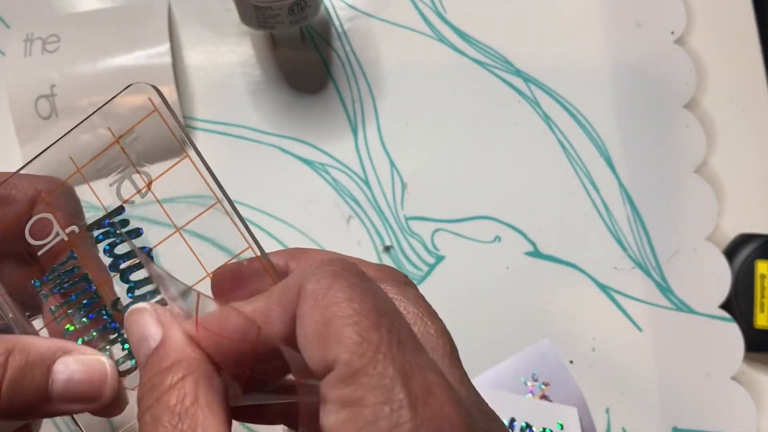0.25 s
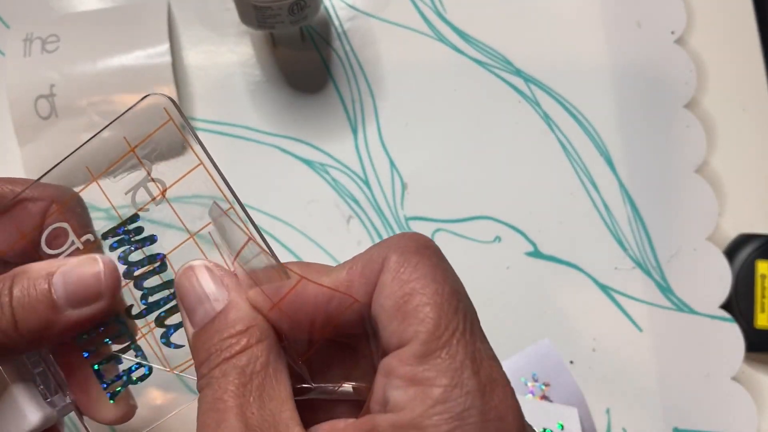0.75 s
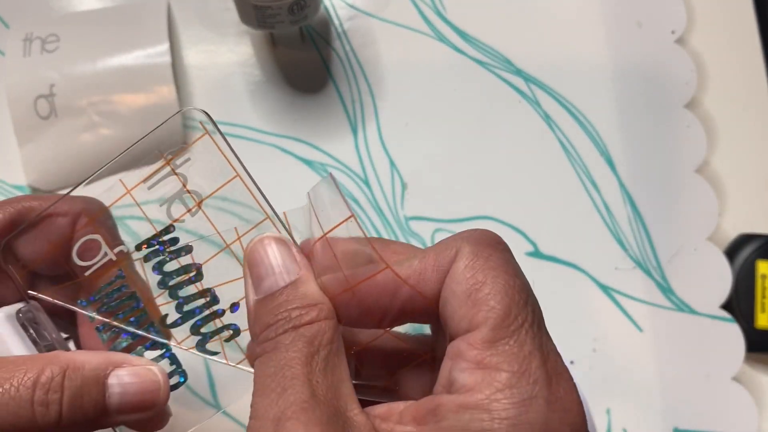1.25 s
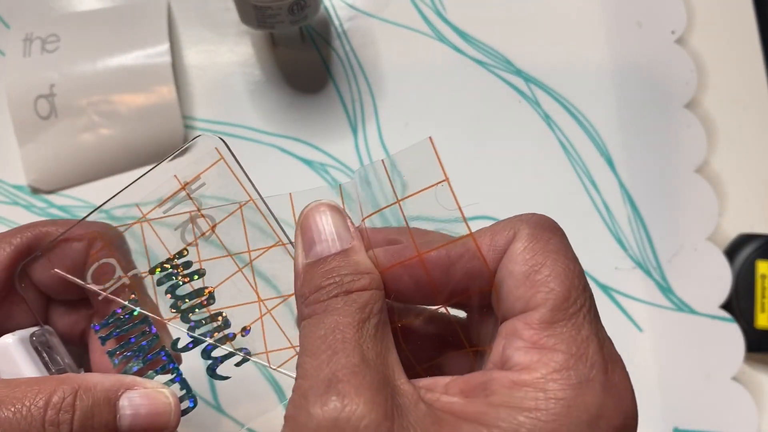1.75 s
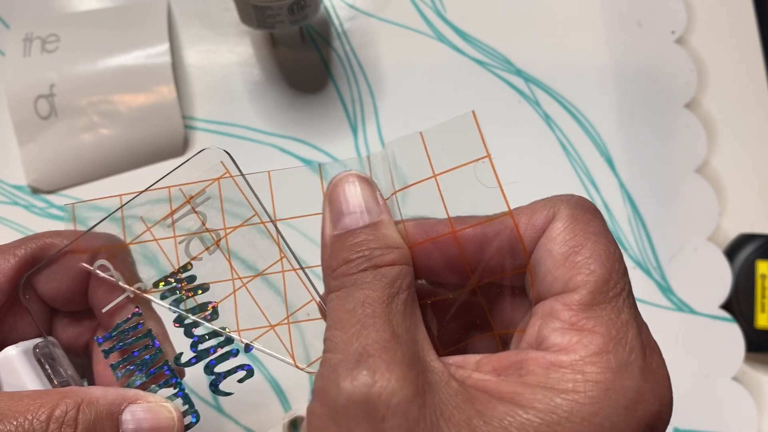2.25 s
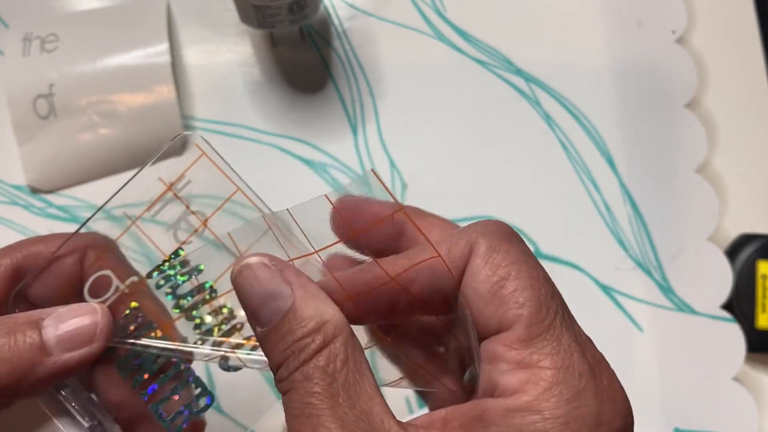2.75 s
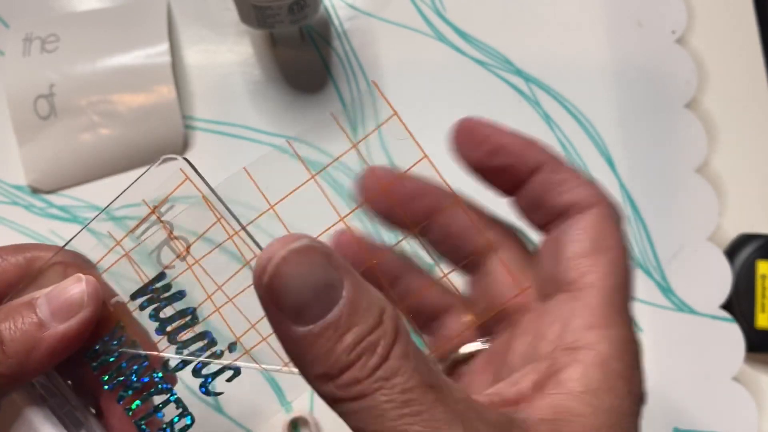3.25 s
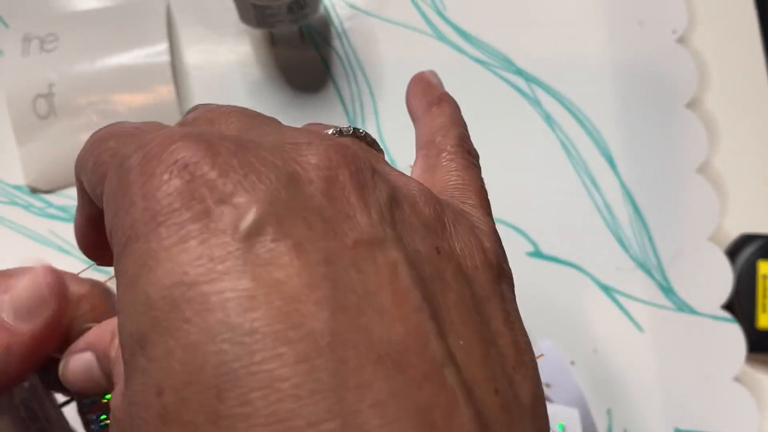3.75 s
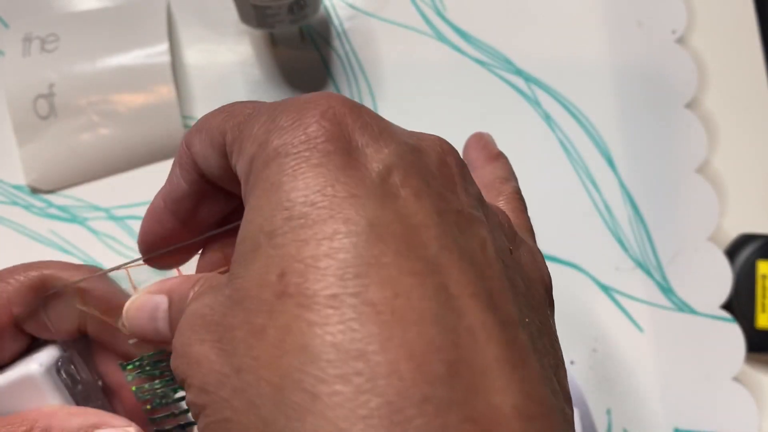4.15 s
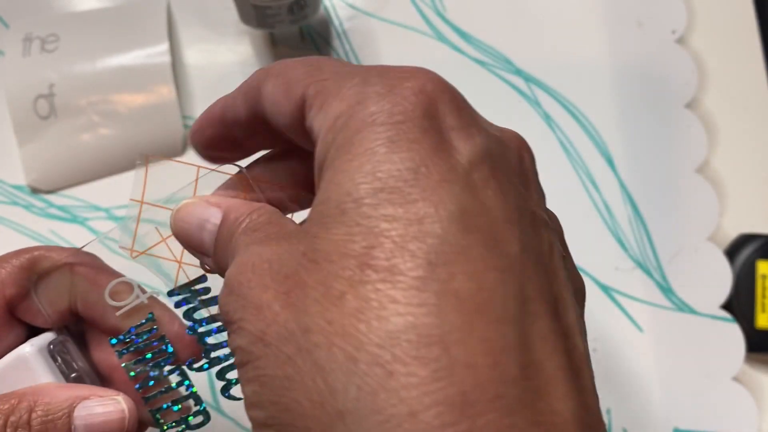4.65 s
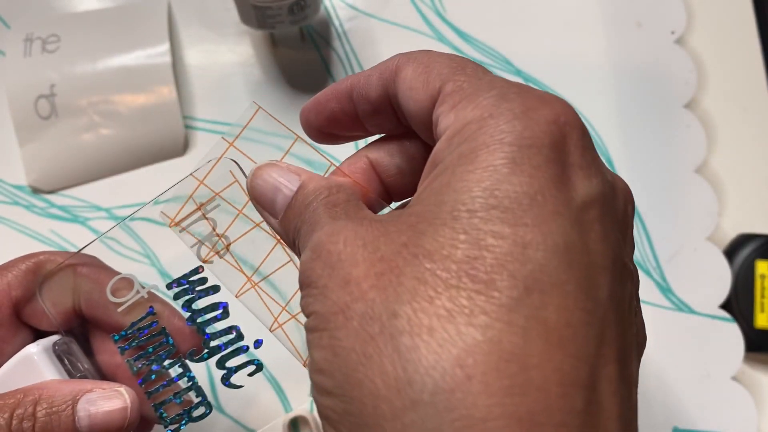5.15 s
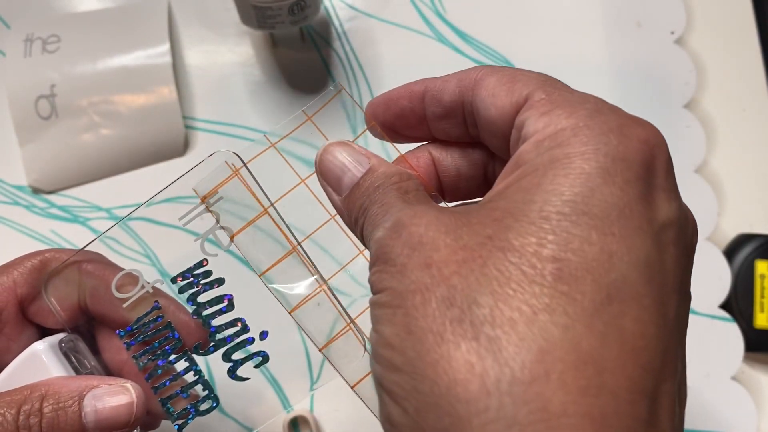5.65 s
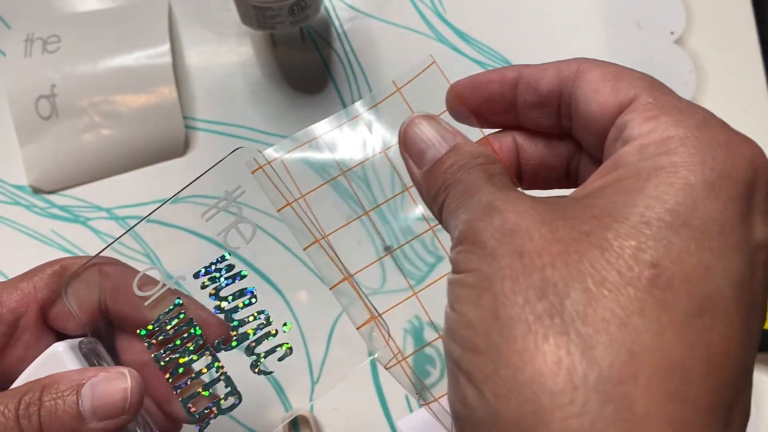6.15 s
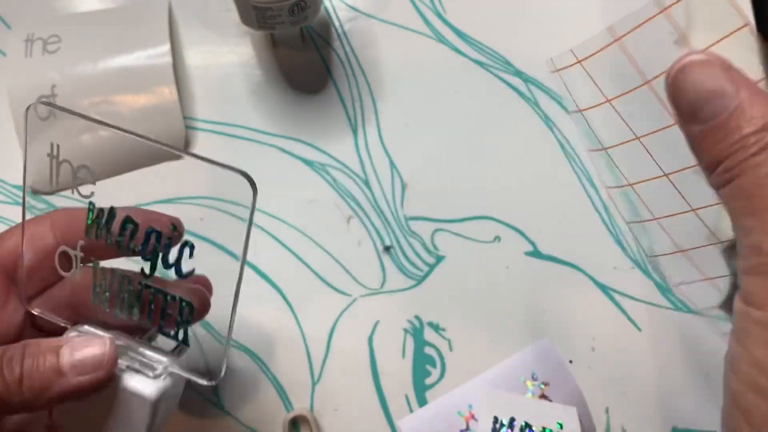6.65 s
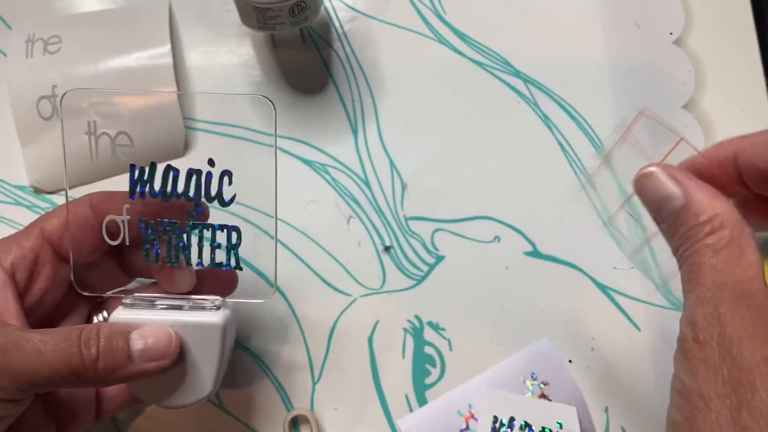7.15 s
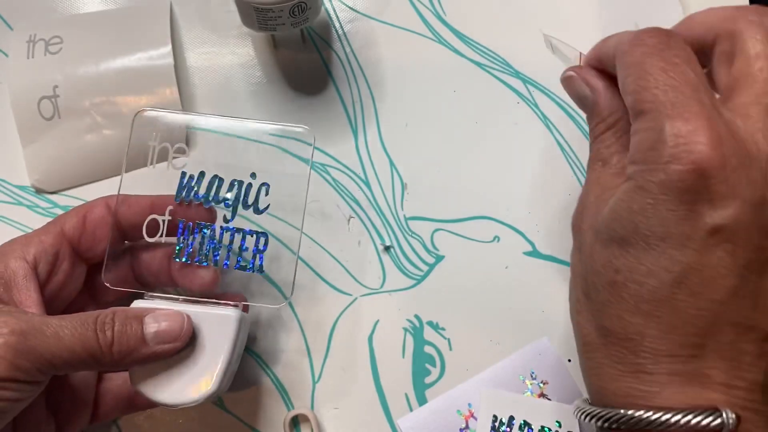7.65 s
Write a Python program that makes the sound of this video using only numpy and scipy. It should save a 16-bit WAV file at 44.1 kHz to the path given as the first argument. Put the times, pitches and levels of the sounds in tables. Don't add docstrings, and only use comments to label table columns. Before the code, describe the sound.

Adhesive plastic film is pressed and peeled from a small rigid panel. Sharp clicks and snaps come irregularly over faint creeping crackle, with tiny ticks, dull creaks and soft low bumps from fingers. A strong crinkle comes just after three seconds, another hard snap near four, then quieter peeling until the film tears free past six seconds. Scattered clicks follow. Very close stereo phone microphone in a small, dry, quiet room.

```python
import sys
import numpy as np
from scipy import signal
from scipy.fft import rfft, irfft, next_fast_len
from scipy.io import wavfile
from scipy.ndimage import uniform_filter1d

SR = 44100
rng = np.random.default_rng(int(sys.argv[2]) if len(sys.argv) > 2 else 0)


def nominal_scale(level):
    x = np.asarray(level, float) / 20
    return 10 ** x


def master(y):
    cut = np.clip(np.atleast_2d(y).T, -1, 1)
    pcm = np.round(cut * 32767)
    wavfile.write(sys.argv[1], SR, pcm.astype(np.int16))


N = 348831

# time in seconds, rustle in dB, brightness of freed film in dB.
STEADY_PULL = [(0, -70.5, 2.5), (.7, -70.5, 6), (1.15, -73.5, 13.5), (1.5, -75, 20), (1.99, -71.5, 9),
               (2.2, -86.5, 16), (2.95, -72.5, 2.5), (3.399, -83.5, 11.5), (4.05, -66.5, 2),
               (4.6, -67, 2.5), (5.1, -74.5, 7.5), (5.5, -68.5, 4), (5.9, -71, 3.5), (6.25, -80, 8.5),
               (6.55, -62.5, 2.5), (6.8, -76, 1.5), (7.001, -89, -7), (7.9, -81, 7.5)]
# top in seconds, rustle in dB, swell and fade in seconds per 30 dB.
TUGS = [(.04, -56, 3.5, 0.45), (.32, -63, 0.2, 1.5), (.59, -56, 0, -0.24), (.8, -66.5, 0.6, 0.1),
        (.91, -65, -0.9, 0.4), (1.42, -46.5, 0.03, 0.13), (1.66, -63, 0.06, 0.5), (2.32, -52.5, 0.1, 0.13),
        (2.51, -52.5, 0.18, 0.16), (2.85, -56, -0.5, 0.15), (3.06, -49, 0, 0.29), (3.2, -36.5, 0.2, 0.0779),
        (3.618, -50.5, 0.03, 0.28), (3.78, -54, 0.19, 0.1), (3.93, -42.5, 0.0255, 0.1266),
        (4.637, -46.5, -0.05, 0.16), (4.69, -55, 0.06, 0.15), (4.88, -61, 0.13, 0),
        (4.97, -62.5, 0.36, 0.05), (6.07, -54.5, 0.28, -0.07), (6.34, -32.5, 0.0452, 0.1531),
        (6.42, -45.5, 0.1137, 0.12), (6.67, -56.5, 0.4, 0.16), (6.74, -51.5, 0.31, 0.09),
        (6.89, -67, 1.1, -0.7), (7.16, -45, 0.01, 0.14), (7.712, -51, 0.05, 0.04), (7.76, -43, 0.08, 0.1),
        (7.91, -59, 0.3, 5)]
# top in seconds, rustle in dB, swell and fade in seconds per 30 dB.
DRAGS = [
    (4.4, -60, 0.52, .5),
    (4.56, -66, -1, 0.95),
]
# top in seconds, rumble in dB, swell and fade in seconds per 30 dB.
GRIP_SHIFTS = [(1.0, -63, 0.5, 0), (1.6, -70, 0.7, 0.7), (2.4, -55.5, 0.3, 0.5), (3.2, -59, 0.6, 0.47),
               (3.93, -52.5, 0.5, 0.28), (4.64, -44, 0.04, 0.03), (4.7, -52.5, 0.2, 0.5),
               (4.9, -56, -0.24, 0.3), (5.37, -66.5, 1.6, 0), (5.6, -62, 0.3, 0.56), (6.8, -66.5, 1, 1.8)]
# start in seconds, panel in dB, fizz in dB, ring in Hz, dying time in ms.
FIRST_SNAPS = [(.024, -28.5, -7.5, 2630, 8.9), (.08, -15.5, -10.5, 4080, 9.8),
               (.566, -48.5, -18, 5700, 5.1), (0.595, -32, -33.5, 3370, 6), (0.798, -23.5, -21.5, 6200, 13),
               (.893, -23.5, -26.5, 3450, 14.3), (1.316, -25, -22, 13500, 6.8), (1.4, -28.5, -31, 6200, 15),
               (1.418, -16.5, -13.5, 6200, 15), (1.643, -25.5, -19.5, 6140, 8.8),
               (1.984, -31, -22, 5700, 5.6), (1.99, -41, -61.5, 585, 19.6), (0.871, -48.5, -61, 3380, 7.5),
               (2.494, -22.5, -16, 3000, 26), (2.838, -35.5, -37.5, 3000, 11),
               (2.852, -27.5, -36.5, 2970, 18), (3.056, -27.5, -33.5, 4200, 34),
               (3.074, -28.5, -40, 3710, 27), (3.118, -31, -38.5, 5960, 74),
               (3.133, -30.5, -34.5, 5250, 27), (3.171, -18, -18, 4370, 9), (3.202, -28, -35.5, 4420, 105)]
# start in seconds, panel in dB, fizz in dB, ring in Hz, dying time in ms.
SECOND_SNAPS = [(3.757, -23, -18, 6590, 18), (3.919, -11.5, -28.5, 3870, 45), (4.633, -39, -32.5, 2490, 28),
                (5.226, -24, -26.5, 2308, 20), (5.359, -17, -22, 14740, 6.7), (5.6, -26.5, -31, 2300, 9.9),
                (5.985, -21.5, -33.5, 2354, 12), (6.059, -21, -31.5, 1154, 20), (6.326, -14, -12, 2715, 15),
                (6.35, -24, -20.5, 583, 24), (6.367, -45, -24.5, 6990, 8), (6.368, -35.5, -32, 2542, 82),
                (6.375, -18.5, -12.5, 4704, 39), (6.378, -13, -9, 4667, 34), (6.382, -26, -44, 1386, 45),
                (6.412, -27, -39, 4033, 45), (6.723, -23.5, -29.5, 3370, 15), (7.13, -23, -22, 4560, 25),
                (7.161, -24, -24.5, 3810, 24), (7.733, -22, -14.5, 5830, 21), (7.738, -26, -32, 3380, 69),
                (7.716, -36.5, -46, 5596, 29)]
# start in seconds, fizz in dB, dying time in ms.
TICKS = [(.165, -45.5, 4.7), (.396, -33.5, 3), (.429, -37.5, 14), (.467, -37, 8.9), (0.514, -28.5, 4),
         (.543, -29, 4.5), (.589, -36.5, 16), (.644, -46.5, 11), (.752, -43, 26), (.944, -36.5, 6.8),
         (1.01, -51.5, 11), (1.142, -37.5, 13), (1.276, -37.5, 12), (1.383, -22.5, 3.4),
         (1.515, -37.5, 9.2), (1.541, -33.5, 6.8), (1.55, -34, 9), (1.564, -41.5, 5.2), (1.617, -41, 9.1),
         (1.675, -34.5, 6), (1.701, -38, 11), (1.713, -40.5, 4.1), (1.74, -46, 6.2), (1.763, -36.5, 14),
         (1.805, -27, 4.9), (1.843, -42, 11), (1.864, -32.5, 9.1), (1.931, -36, 20)]
# start in seconds, fizz in dB, dying time in ms.
LATE_TICKS = [(2.324, -27, 13), (2.562, -41.5, 180), (2.818, -46.5, 45), (3.034, -38.5, 50),
              (3.049, -41.5, 8.9), (3.684, -32, 6.7), (3.703, -45, 8.3), (3.726, -42, 46),
              (4.057, -41.5, 36), (4.367, -35.5, 4.5), (4.692, -38.5, 12.6), (4.825, -59.5, 12),
              (4.983, -33, 12.3), (5.491, -53, 80), (5.781, -49, 29), (7.085, -45.5, 40), (7.36, -71, 93),
              (7.569, -60, 100), (6.303, -47.5, 35)]
# start in seconds, panel in dB, ring in Hz, dying time in ms.
CREAKS = [(.41, -53, 1190, 16), (.62, -53, 3260, 23), (.737, -47.5, 3460, 17), (0.765, -50.5, 3420, 23),
          (0.967, -47.5, 700, 25), (1.185, -49.5, 4370, 72), (2.289, -46.5, 910, 19),
          (2.308, -29.5, 1036, 47), (2.38, -35, 980, 41), (2.454, -45, 1030, 27), (3.147, -36.5, 2580, 30),
          (3.221, -34.5, 2060, 98), (3.591, -45.5, 1360, 160), (3.615, -36, 2290, 21),
          (3.664, -37.5, 2400, 41), (3.798, -34, 950, 25), (4.057, -46.5, 2500, 15),
          (4.21, -44.5, 1950, 13), (1.685, -53.5, 550, 25), (1.761, -52, 1220, 15), (1.932, -49.5, 805, 23),
          (2.566, -50.5, 690, 47), (7.038, -62, 1930, 11.7), (7.151, -37.5, 4000, 12),
          (4.626, -40, 1010, 65), (4.641, -45, 2510, 60), (4.754, -54.5, 815, 17), (4.793, -65, 910, 20),
          (4.831, -57.5, 1300, 20), (4.861, -55, 2500, 16), (4.873, -54, 2430, 20), (6.63, -50.5, 2600, 20),
          (6.667, -47.5, 3000, 34), (4.905, -58, 900, 16), (7.527, -57, 3000, 33), (4.962, -46.5, 2630, 32),
          (4.972, -37, 2500, 45), (5.686, -39.5, 1206, 9.3), (6.126, -39, 950, 8.8), (6.341, -31, 2370, 91),
          (6.82, -47, 3460, 64), (6.886, -56.5, 1210, 96), (7.076, -52, 1970, 150),
          (7.112, -54.5, 1920, 84), (7.773, -35.5, 2400, 67), (7.882, -39, 4660, 16),
          (7.903, -36.5, 1370, 21)]
# start in seconds, ring in dB, frequency in Hz, dying time in ms.
RINGS = [(.025, -35, 1210, 15), (0.079, -17, 4200, 12), (.082, -41.5, 3300, 90), (0.601, -45.5, 3270, 70),
         (.8, -45.5, 4700, 50), (.9, -47, 3030, 88), (1.316, -24, 14560, 6), (1.422, -37, 3890, 120),
         (1.425, -42, 5005, 80), (3.921, -21.5, 3826, 25), (5.359, -14, 15240, 6), (6.125, -38, 913, 9),
         (4.615, -43.5, 900, 76), (.024, -21, 2448, 14), (5.986, -29, 1100, 15), (6.35, -28.5, 602, 16),
         (6.351, -22, 6970, 14), (6.414, -30, 6990, 20), (4.21, -49.5, 4720, 12), (4.629, -41.5, 1060, 91),
         (4.648, -38.5, 604, 35), (7.131, -23.5, 3100, 21), (6.327, -22, 1468, 14), (7.14, -38, 2970, 100),
         (7.741, -38, 2570, 60), (.595, -21.5, 3620, 13.4), (0.892, -32, 1460, 19), (.893, -31, 2620, 12),
         (1.317, -37, 3920, 27.9), (1.4, -40, 2450, 11), (1.417, -29, 3940, 4.5), (2.496, -18, 4470, 17),
         (2.494, -13, 3010, 21), (2.498, -37, 3075, 160), (3.128, -35.5, 5400, 35), (3.758, -28, 3140, 27),
         (3.926, -27.5, 2444, 30), (4.633, -41.5, 2700, 23), (4.972, -36, 1224, 54), (5.228, -26, 3660, 13),
         (5.296, -45, 896, 26), (5.602, -30.5, 1134, 17), (5.958, -50, 2470, 14), (6.063, -32.5, 596, 20.9),
         (6.378, -18, 1250, 12), (6.398, -32, 2581, 130), (7.078, -49, 1950, 72),
         (7.163, -33.5, 1960, 21.7)]
# start in seconds, thump in dB, settled pitch in Hz.
BUMPS = [(0.079, -50, 151.2), (1.318, -54, 203), (1.643, -42.5, 136), (2.307, -38, 147),
         (2.383, -38.5, 151.2), (2.455, -40, 146), (2.703, -44, 240), (2.836, -38.5, 199.4),
         (2.852, -41, 253), (3.121, -43.5, 149.5), (3.658, -41, 131.5), (3.796, -42.5, 129),
         (3.921, -25.5, 152), (4.64, -37.5, 90), (4.692, -38, 149.6), (4.675, -39, 109), (4.735, -45, 70),
         (4.751, -45, 65.8), (4.781, -49, 70), (4.861, -51.5, 68), (4.885, -48, 66), (4.912, -47.5, 61.85),
         (4.971, -44.5, 149), (5.296, -50, 119.3), (5.358, -45.5, 132), (5.549, -49.5, 259),
         (5.587, -44, 138), (5.965, -49.5, 108.2), (6.06, -29.5, 329.6), (6.124, -44, 250.3),
         (6.343, -32, 152), (6.351, -35.5, 205), (7.527, -36, 188), (7.545, -42.5, 130),
         (7.733, -39, 149.3)]
# frequency in Hz, level in dB.
RUMBLE_COLOUR = [(20, -29), (40, -4.5), (66, 4), (130, -3), (250, -8.5), (420, -20.5), (900, -28.5),
                 (1500, -74.5)]
# frequency in Hz, level in dB.
KNOCK_COLOUR = [(20, -29), (45, -11), (70, -1), (130, -5), (275, -3), (500, -6.5), (800, -19),
                (1500, -59.5)]
# frequency in Hz, level in dB.
PANEL_COLOUR = [(150, -45.5), (400, 0), (900, -0.5), (1300, -2), (1750, -7.5), (2300, 0), (3000, 1.5),
                (3400, -0.5), (3900, 2.5), (4600, 0), (5200, -6), (6100, -20), (7000, -77.5)]
# frequency in Hz, level in dB.
FILM_COLOUR = [(3000, -57.5), (4600, -30), (5400, -4), (6000, -3.5), (7000, 0), (8500, 0), (10000, -4),
               (12000, -6.5), (14500, -8.5), (15800, -8), (16600, -25.5), (17200, -72)]
# frequency in Hz, level in dB.
LOOSE_COLOUR = [(300, -21), (900, -12.5), (1900, -3), (3000, -5.5), (4500, 0.5), (5400, -4), (6300, -29.5)]
# frequency in Hz, level in dB.
TAUT_COLOUR = [(200, -36.5), (450, -4.5), (700, -15), (1160, -12), (1600, -15), (2500, -2.5), (5300, -3),
               (6300, -22.5)]
# frequency in Hz, level in dB.
FOLDED_COLOUR = [(250, -27), (520, -7), (1250, -1.5), (1780, -14.5), (2650, 3), (3300, -12.5), (4500, -5.5),
                 (6100, -20)]
# frequency in Hz, level in dB.
AIR_COLOUR = [(25, -25.5), (63, 3), (95, -11), (250, -20.5), (600, -25.5), (1250, -30.5), (2500, -35.5),
              (5000, -30), (7000, -32), (9000, -39), (16000, -46), (17000, -90)]
# frequency in Hz, t60 in seconds.
ROOM_T60 = [(100, 0.054), (1000, 0.25), (4000, 0.14), (12000, 0.1)]
# frequency in Hz, ratio in dB.
PORT_RATIO = [(40, -34.5), (125, -23), (300, -12), (1400, -11.5), (2200, -11.5), (2600, -5), (3100, -10.5),
              (4600, -9.5), (5300, 7), (6100, 13.5), (6800, 14.5), (12000, 9), (15000, 6.5)]
# frequency in Hz, phase in radians.
PORT_LAG = [(200, 1.2), (600, 1.5), (1400, 1.05), (3000, 1.35), (6000, 1.6)]
# start in seconds, length in ms.
TREBLE_KEPT = [(.586, 25), (.631, 20), (.725, 50), (1.49, 28), (1.562, 73), (1.658, 27), (1.7, 25),
               (1.745, 29), (1.925, 33), (2.551, 40), (2.695, 28), (3.215, 24), (3.575, 34), (3.622, 27),
               (4.04, 45), (6.285, 25), (6.645, 24), (6.798, 39), (6.86, 35), (7.077, 18), (7.151, 36),
               (7.65, 66)]
# start in seconds, length in ms.
TREBLE_WHOLE = [(.426, 8), (.464, 8), (4.363, 9), (1.855, 39), (2.37, 40), (2.452, 9), (2.815, 50),
                (5.48, 35), (5.767, 25), (3.023, 80), (3.655, 25), (3.717, 30), (3.914, 12), (4.6, 74),
                (6.365, 26), (7.225, 32), (7.555, 30), (7.879, 10), (3.188, 28)]

REGRIP_S, FREE_S = 3.45, 6.28
LOOSE_FROM_S, LOOSE_TO_S = 7.02, 7.56
TICK_HZ = 5830


def evened(x):
    return x / np.sqrt(np.mean(x ** 2) + 1e-20)


def read(points, hz):
    f, value = np.transpose(points)
    return np.interp(np.log(hz + 1), np.log(f + 1), value)


def add(mix, start_s, sound):
    part = mix[round(start_s * SR):][:len(sound)]
    part += sound[:len(part)]


def colour(x, points, size=8192):
    gain_db = np.maximum(read(points, abs(np.fft.fftfreq(size, 1 / SR))), -100)
    spectrum = np.exp(np.conj(signal.hilbert(np.log(nominal_scale(gain_db)))))
    taps = np.fft.ifft(spectrum).real[:size // 2]
    return signal.oaconvolve(x, taps / np.linalg.norm(taps))[:N]


def shaped(x, gain):
    size = next_fast_len(N)
    return irfft(rfft(x, size) * gain(np.fft.rfftfreq(size, 1 / SR)), size)[..., :N]


def joined(low, high, hz):
    above = signal.lfilter(*signal.butter(2, hz, 'high', fs=SR), high)
    below = signal.lfilter(*signal.butter(2, hz, fs=SR), low)
    return above - below


def crackle(count, per_s, spread_db, hiss):
    breaks = rng.random(count) < per_s / SR
    size = nominal_scale(spread_db * np.minimum(rng.exponential(1, count), 4)) * breaks
    threads = evened(size * rng.standard_normal(count))
    return evened(threads + hiss * rng.standard_normal(count))


def swells(rows):
    t = np.arange(0, N + 64, 64) / SR
    power = np.zeros(len(t))
    for top_s, db, rise_s, fade_s in rows:
        away = np.maximum((top_s - t) / abs(rise_s), (t - top_s) / abs(fade_s))
        power += nominal_scale(db - 30 * away) ** 2
    return np.interp(np.arange(N) / SR, t, np.sqrt(power))


def air(air_db=-72, hum_hz=240, hum_db=-79.5):
    noise = np.array([colour(v, AIR_COLOUR) for v in rng.standard_normal((2, N))])
    hum = np.sqrt(2) * np.sin(2 * np.pi * hum_hz * np.arange(N) / SR)
    return nominal_scale(air_db) * noise + nominal_scale(hum_db) * hum


def patchy(x, patchy_db=3.0):
    hz, t, z = signal.stft(x, SR, nperseg=512)
    field = rng.standard_normal((len(t), len(hz))).T
    field = uniform_filter1d(uniform_filter1d(field, size=9, axis=0), size=26, axis=1)
    return signal.istft(z * nominal_scale(patchy_db * evened(field)), SR, nperseg=512)[1][:N]


def pull(linger, flicker_db=4.0):
    fizz_db, fizz_power, rumble_db, rumble_power = -58.5, 0.88, -60, 0.98
    rest_rumble_db, tug_creep_db = -80, -11.5
    t = np.arange(N) / SR
    s, *levels = np.transpose(STEADY_PULL)
    steady_db, bright_db = (np.interp(t, s, v) for v in levels)
    tug = swells(TUGS)
    effort = tug / nominal_scale(-50)
    fizz = nominal_scale(fizz_db) * effort ** fizz_power
    tug_rumble = nominal_scale(rumble_db) * effort ** rumble_power
    grip = np.hypot(tug_rumble, swells(GRIP_SHIFTS)) + nominal_scale(rest_rumble_db)

    flicker = nominal_scale(flicker_db * evened(uniform_filter1d(rng.standard_normal(N), 500)))
    threads = flicker * crackle(N, per_s=900, spread_db=2.5, hiss=0.6)
    hiss = crackle(N, per_s=3600, spread_db=1.5, hiss=2.0) * flicker ** 0.45
    folded = (t > REGRIP_S) & (t < FREE_S)
    loose = (t > LOOSE_FROM_S) & (t < LOOSE_TO_S)

    drag = np.hypot(nominal_scale(steady_db), swells(DRAGS)) * hiss + nominal_scale(tug_creep_db) * tug * threads
    creep = patchy(colour(drag * ~folded, TAUT_COLOUR) + colour(drag * folded, FOLDED_COLOUR))
    rumble = colour(grip * rng.standard_normal(N), RUMBLE_COLOUR)
    rustle = colour(tug * threads * ~loose, PANEL_COLOUR) + colour(tug * threads * loose, LOOSE_COLOUR)
    film = colour(fizz * threads + nominal_scale(steady_db + bright_db) * hiss + linger, FILM_COLOUR)
    return rumble + nominal_scale(-2.3) * rustle + creep + film


def releases():
    none, rows = -np.inf, []
    for s, db, fizz_db, hz, ms in FIRST_SNAPS + SECOND_SNAPS:
        rows.append((s, db, db - 27.5, fizz_db, db if hz < 5300 else fizz_db, hz, ms))
    ticks = TICKS + LATE_TICKS
    tick_hz = TICK_HZ * np.exp(0.14 * abs(rng.standard_normal(len(ticks))))
    for (s, db, ms), hz in zip(ticks, tick_hz):
        rows.append((s, db - 17, none, db, db, hz, ms))
    for s, db, hz, ms in CREAKS:
        rows.append((s, db, db - 16, db - 12, db, hz, ms))
    for s, db, hz, ms in RINGS:
        rows.append((s, none, none, none, db, hz, ms))
    for s, db, hz in BUMPS:
        rows.append((s, none, db - 9.5, none, none, TICK_HZ, 27))
    return rows


def snaps(rise_ms=0.32, rise_per_dying=0.026, thump_rise_ms=1.8, thump_ms=45, ring_db=-1, ring_width=.12,
          tick=1.2, crack=3.23, crack_ms=18, film_ms=30):
    body_hz, body_db, body_db_per_octave = 1370, -0.1, -5.5
    sheen_hz, sheen_db, sheen_db_per_octave = 10000, 1.2, 4
    facing_hz, film_in_air_db = 12000, -5.5
    thump, body, panel, film, sheen, linger, rings, facing = np.zeros((8, N))
    ms = np.arange(6000) * 1000 / SR
    early = nominal_scale(-60 * (ms / film_ms) ** 2)
    slips = crackle(N + len(ms), per_s=9000, spread_db=2.5, hiss=0.48)
    for s, panel_db, thump_db, fizz_db, level_db, hz, die_ms in releases():
        slip = slips[round(s * SR):][:len(ms)]
        rise = 1 - np.exp(-ms / (rise_ms + rise_per_dying * die_ms))
        burst = slip * rise * nominal_scale(-60 * ms / max(die_ms, 1))
        burst = burst * (1 + tick * np.exp(-ms / .6))
        burst[8] += crack * np.exp(-die_ms / crack_ms)
        loose_db = film_in_air_db * (LOOSE_FROM_S < s < LOOSE_TO_S)

        push = (1 - np.exp(-(ms / thump_rise_ms) ** 2)) * nominal_scale(-60 * ms / (die_ms + thump_ms))
        add(thump, s, nominal_scale(thump_db + loose_db) * push * slip)
        tilt_db = body_db + body_db_per_octave * np.log2(hz / body_hz)
        add(body, s, nominal_scale(panel_db + loose_db + tilt_db) * burst)
        add(panel, s, nominal_scale(panel_db) * burst)

        add(film, s, nominal_scale(fizz_db) * burst * early)
        tilt_db = sheen_db + sheen_db_per_octave * np.log2(hz / TICK_HZ)
        add(sheen, s, nominal_scale(fizz_db + tilt_db) * burst * early)
        add(linger, s, nominal_scale(fizz_db) * burst * (1 - early))

        b, a = signal.iirpeak(hz, 1 / ring_width, SR)
        ring = np.sqrt(SR / (np.pi * hz * ring_width)) * signal.lfilter(b, a, burst)
        add(facing if hz > facing_hz else rings, s, nominal_scale(level_db + ring_db) * ring)
    panel, film = joined(body, panel, body_hz), joined(film, sheen, sheen_hz)
    near = nominal_scale(2.0) * colour(thump, KNOCK_COLOUR) + nominal_scale(-3.0) * colour(panel, PANEL_COLOUR)
    return near + nominal_scale(-0.5) * colour(film, FILM_COLOUR) + rings, facing, linger


def bumps(tone_db=1.5, die_cycles=7.6, glide=1.6, glide_ms=2.5, rise_s=0.0014):
    out, t = np.zeros(N), np.arange(8000) / SR
    for s, db, hz in BUMPS:
        turns = hz * (t + glide * glide_ms / 1000 * (1 - np.exp(-1000 * t / glide_ms)))
        level = nominal_scale(db + tone_db - 60 * hz * t / die_cycles) * (1 - np.exp(-t / rise_s))
        add(out, s, level * np.sin(2 * np.pi * turns))
    return out


def room(x, gap=260):
    size = SR // 2
    taps = np.zeros((2, size))
    at = np.arange(gap, size - 20, 20)
    at = at + rng.integers(0, 20, (2, len(at)))
    np.put_along_axis(taps, at, rng.choice([-1., 1.], at.shape), 1)
    hz, t, z = signal.stft(taps, SR, nperseg=128)
    decay = nominal_scale(-60 * t / read(ROOM_T60, hz)[:, None])
    tail = signal.istft(z * decay, SR, nperseg=128)[1]
    return signal.fftconvolve(x[None], tail / np.linalg.norm(tail[0]), axes=1)[:, :N]


def ports(pair, wide_db, treble_db):
    def ratio(hz):
        return nominal_scale(read(PORT_RATIO, hz) + wide_db + treble_db * (hz > 5300))
    mid = shaped(pair[0], lambda hz: 1 / np.sqrt(1 + ratio(hz) ** 2))
    side = shaped(pair[1], lambda hz: np.exp(-1j * read(PORT_LAG, hz)) / np.sqrt(1 + ratio(hz) ** -2.))
    return np.array([mid + side, mid - side])


def trimmed(pair):
    crisp_ms, before_ms, after_ms, weak_db = 27, 4, 6, -34
    edge_hz, edge_hz_per_db, edge_top_hz, edge_from_db = 5250, 30, 6200, -74
    bands_kept, top_hz, crisp_top_hz = .5, 16000, 16800
    mid, side = (pair[0] + pair[1]) / 2, (pair[0] - pair[1]) / 2
    hz, t, z = signal.stft(np.array([mid, side]), SR, nperseg=256, noverlap=192)
    sharp = [(s, fizz_db, ms) for s, db, fizz_db, f, ms in FIRST_SNAPS + SECOND_SNAPS]
    sharp = [row for row in sharp + TICKS + LATE_TICKS if row[2] < crisp_ms]
    crisp = [(s - before_ms / 1000, before_ms + after_ms, db > weak_db) for s, db, ms in sharp]

    def during(spans):
        return np.any([(t > row[0]) & (t < row[0] + row[1] / 1000) for row in spans], axis=0)

    strong = during([row for row in crisp if row[2]])
    block = np.arange(len(t)) // 16
    chosen = rng.random((len(t), len(hz))) < bands_kept
    bands = chosen[block][:, np.arange(len(hz)) // 5].T
    kept = strong | during(TREBLE_WHOLE) | during(crisp + TREBLE_KEPT) & bands

    power = uniform_filter1d((abs(z[0, 12:29]) ** 2).sum(0), size=16)
    loud_db = 10 * np.log10(abs(power) + 1e-12)[block * 16]
    edge = np.clip(edge_hz + edge_hz_per_db * (loud_db - edge_from_db), edge_hz, edge_top_hz)
    top = hz[:, None] < np.where(strong, crisp_top_hz, top_hz)
    gates = [top & (kept | (hz[:, None] < edge)), top]
    mid, side = signal.istft(z * gates, SR, nperseg=256, noverlap=192)[1][:, :N]
    return np.array([mid + side, mid - side])


def treble_flecks(side, bar=1.25, bar_per_octave=-2.4):
    hz, t, z = signal.stft(side, SR, nperseg=512)
    field = rng.standard_normal((len(t), len(hz))).T
    field = evened(uniform_filter1d(uniform_filter1d(field, size=4, axis=0), size=7, axis=1))
    need = bar + bar_per_octave * np.log2(np.clip(hz, 1, 14500) / 14500)
    treble = (hz > 7000) & (hz < 15900)
    gate = np.clip(4 * (field - need[:, None]), 0, 1) * treble[:, None]
    return signal.istft(z * gate, SR, nperseg=512)[1][:N]


def scene():
    near, facing, linger = snaps()
    near = near + bumps()
    creep = pull(linger)
    tail = nominal_scale(-19.0) * room(near + facing + creep)
    wide = ports(tail + air() + creep, wide_db=6.0, treble_db=-2.7)
    direct = ports([near, near], wide_db=1.5, treble_db=1.0)
    direct = direct + ports([facing, facing], wide_db=-5.5, treble_db=2)
    return trimmed(direct + wide) + treble_flecks((wide[0] - wide[1]) / 2)


def low_pass(x):
    return signal.sosfilt(signal.butter(12, 16990, fs=SR, output="sos"), x)


def record(dry):
    ceiling = .95
    return low_pass(ceiling * np.tanh(dry / ceiling))


dry = scene()
out = record(dry)
master(out)
```